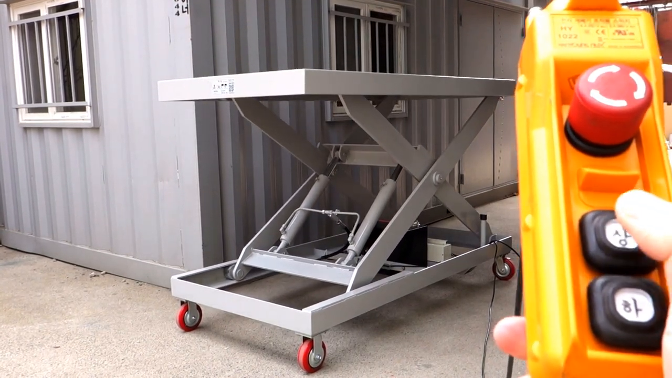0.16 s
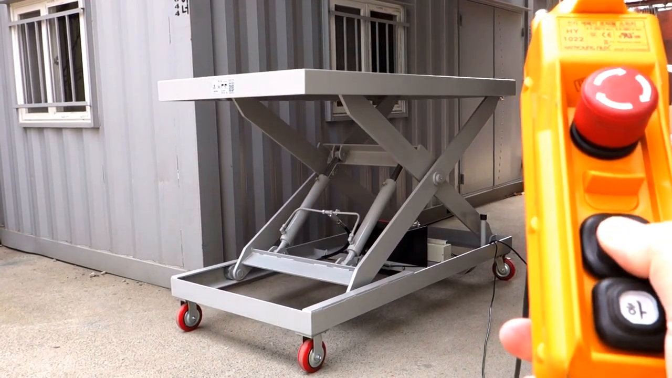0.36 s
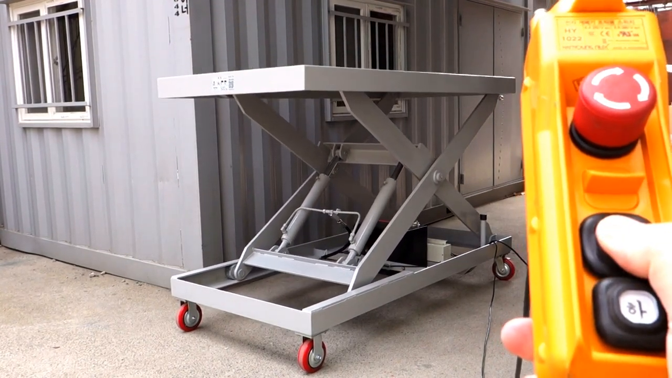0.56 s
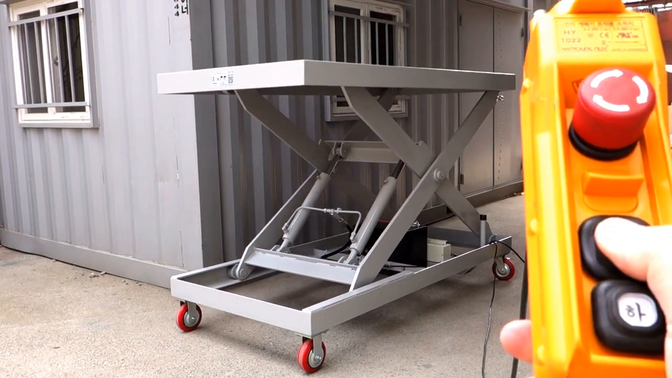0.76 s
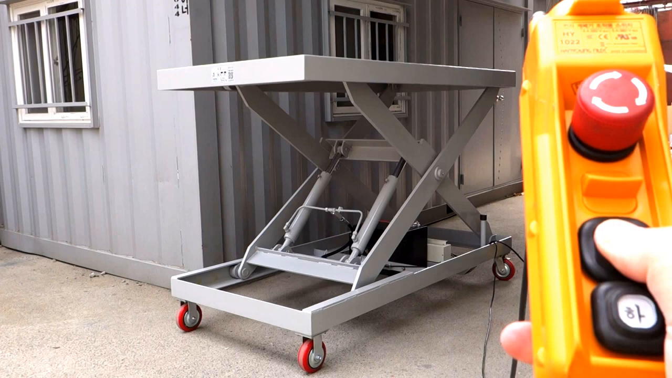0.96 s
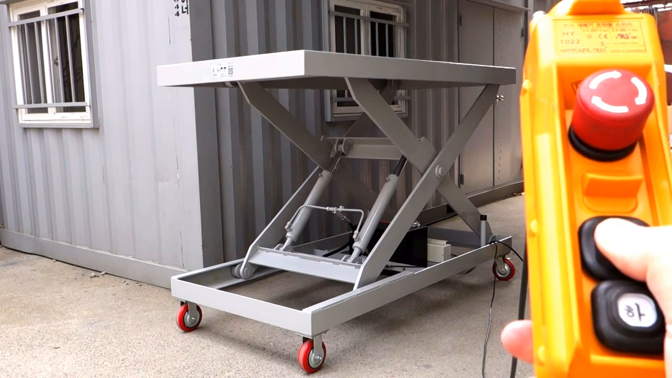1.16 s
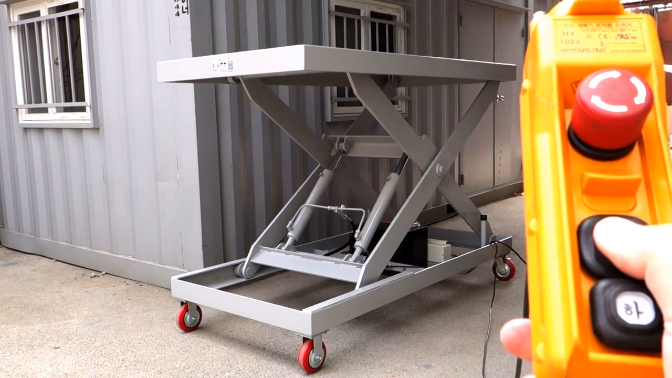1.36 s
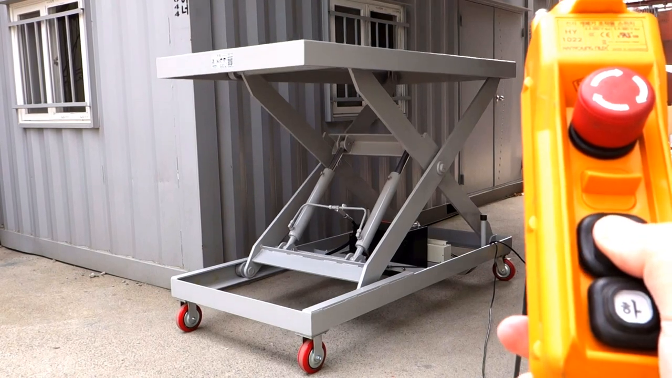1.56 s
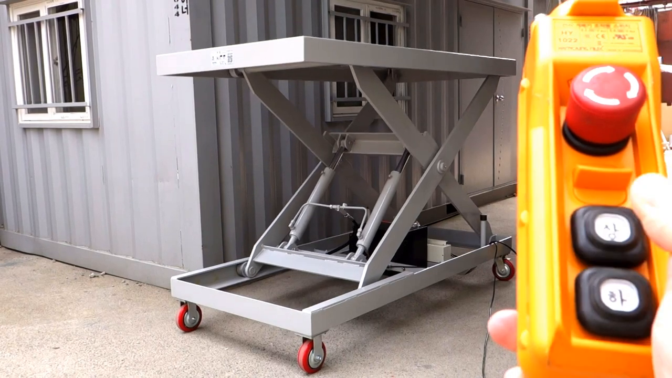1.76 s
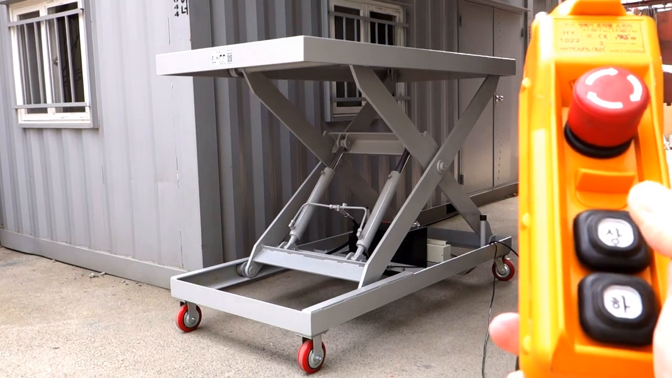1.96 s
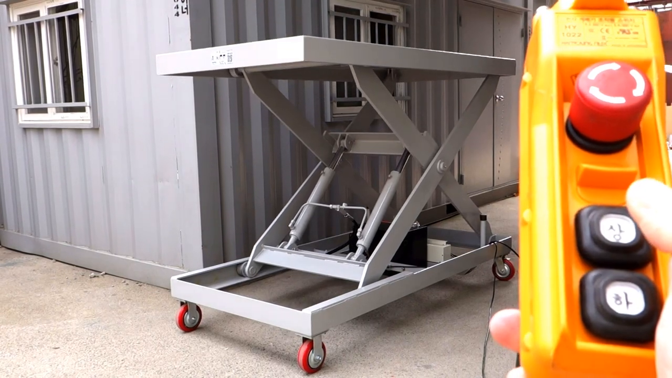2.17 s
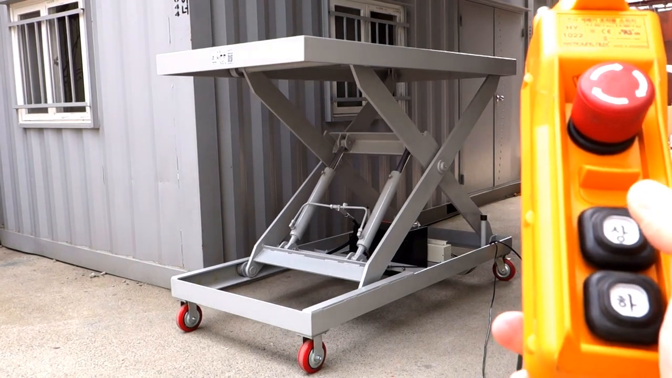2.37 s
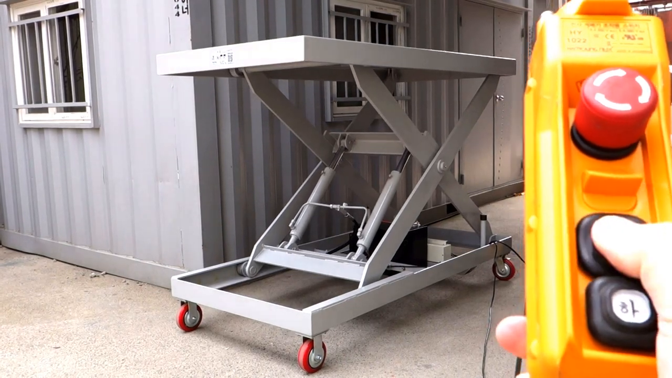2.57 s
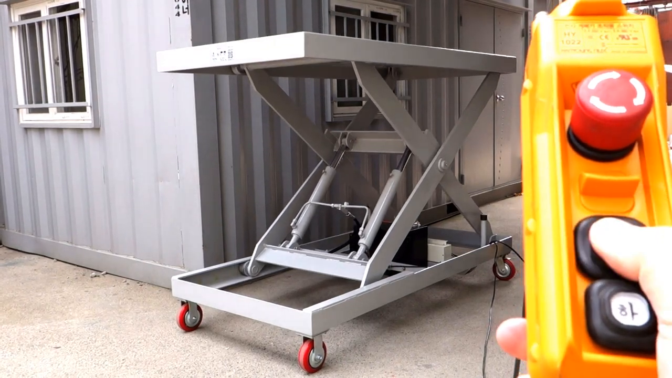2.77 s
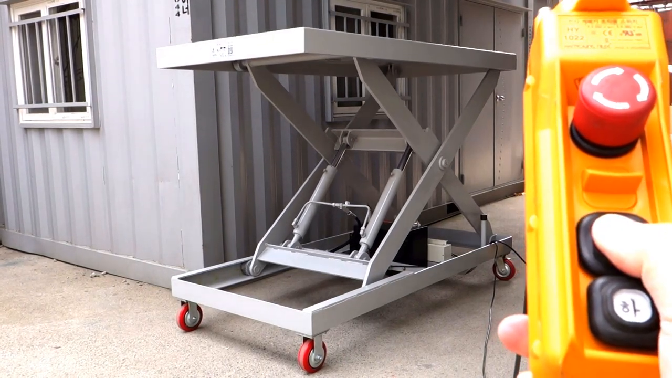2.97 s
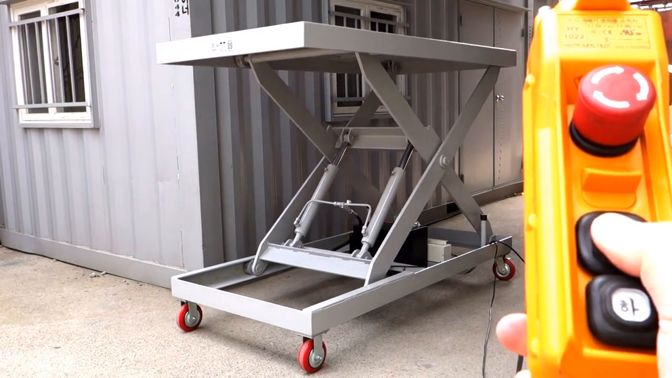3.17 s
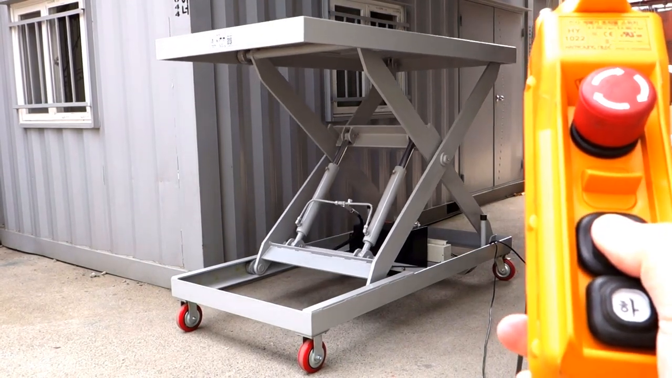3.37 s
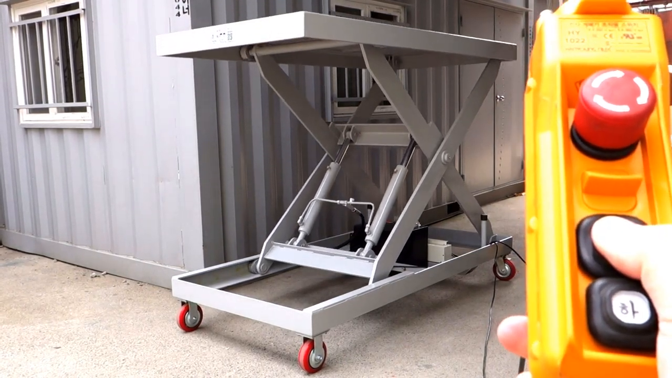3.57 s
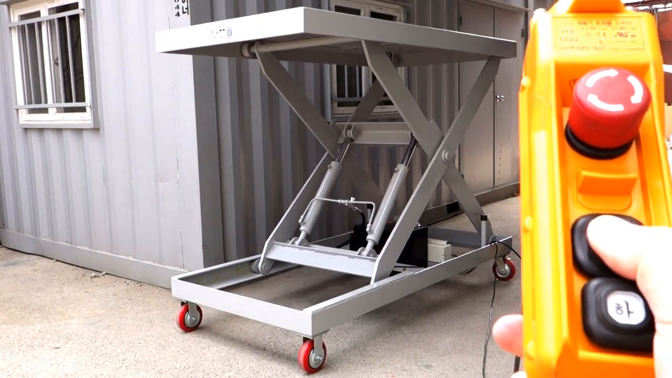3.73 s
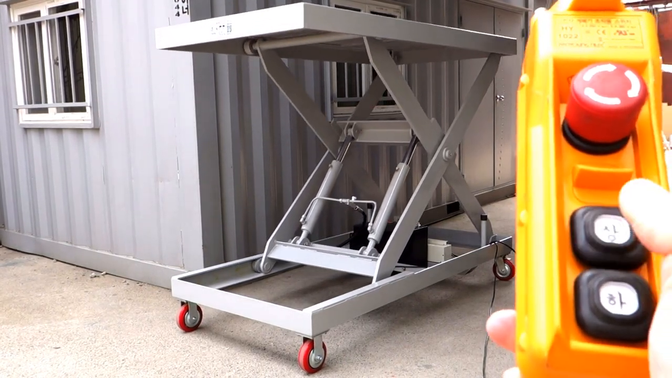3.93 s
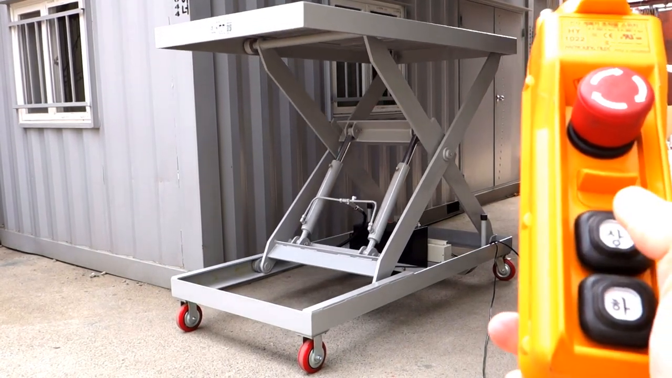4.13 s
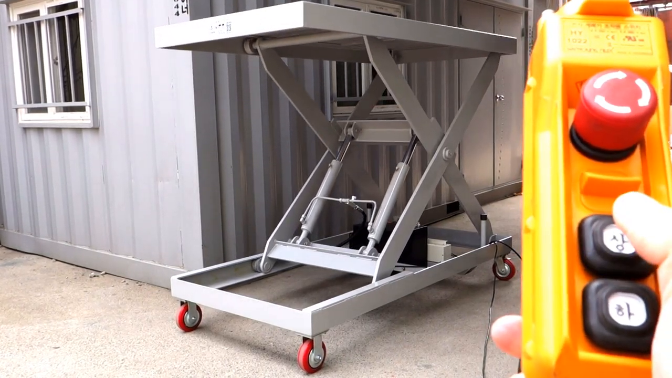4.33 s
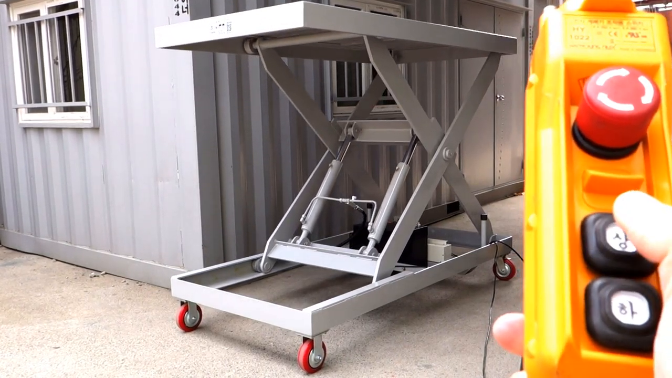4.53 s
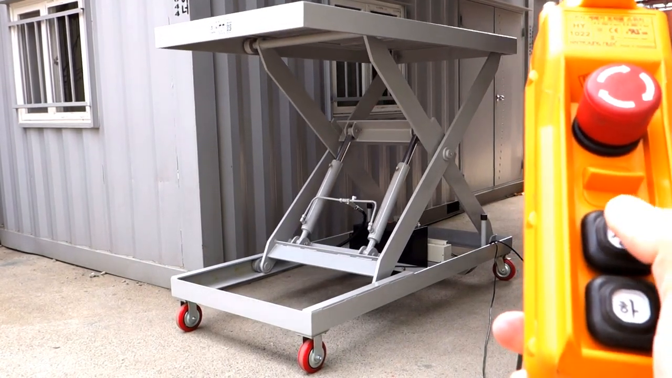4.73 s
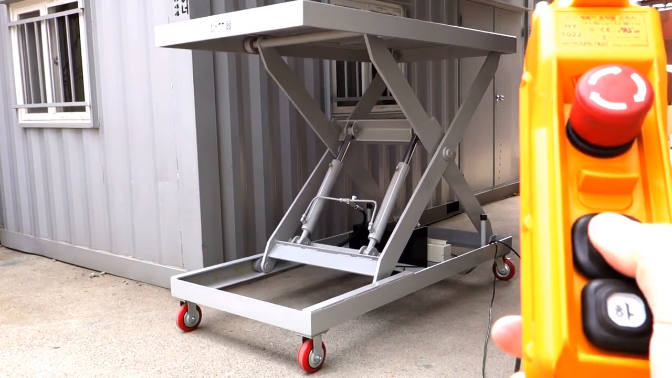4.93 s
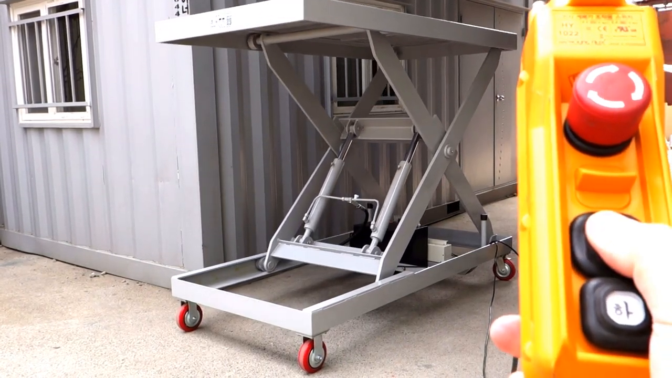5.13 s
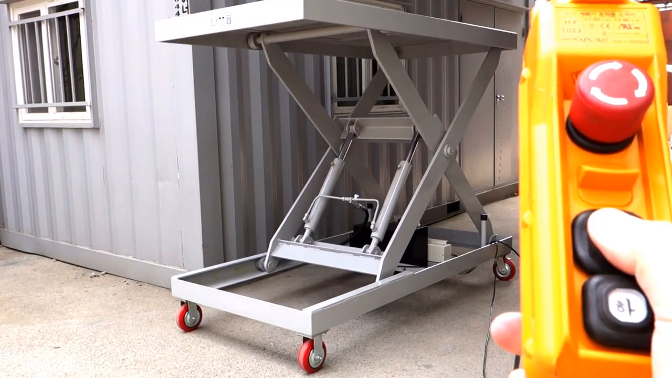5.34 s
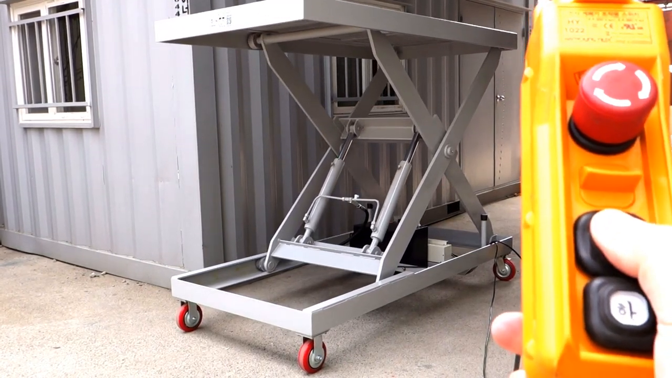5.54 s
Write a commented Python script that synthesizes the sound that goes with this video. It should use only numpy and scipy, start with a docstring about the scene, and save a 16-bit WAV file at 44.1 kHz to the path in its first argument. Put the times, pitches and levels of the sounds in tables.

```python
"""In a yard between steel walls, a lift table rises in three short runs; its hand pendant is close to the listener.
Short noise bursts make the button ticks; noise, ringing modes and echoes make the contactor clacks.
Steady tones and a repeating shaft pattern make the motor and nine-tooth gear pump; the frame rumbles and knocks.
Behind it lie shaped noise for far traffic and machines, and two soft tones for a faint hum that swells once."""
import sys
import numpy as np
from scipy import signal
from scipy.fft import rfft, irfft
from scipy.io import wavfile
from scipy.ndimage import uniform_filter1d

SR = 44100
rng = np.random.default_rng(int(sys.argv[2]) if len(sys.argv) > 2 else 0)


def dump_mix(stems):
    """Bounce the given channels to the path in sys.argv[1] as a 16-bit WAV at rate SR."""
    frames = np.atleast_2d(stems).T  # one column per channel
    limited = np.clip(frames, -1, 1)  # hard clip at full scale
    pcm = np.round(limited * 32767).astype(np.int16)
    wavfile.write(sys.argv[1], SR, pcm)


N = 246959
T = np.arange(N) / SR  # time in seconds

TOOTH_HZ, TEETH = 267.5, 9  # gear teeth meeting per second at full speed, teeth on the gear
EDGE_HZ = 15700  # upper limit of the sound
# How alike left and right are. Each row: pitch in Hz, likeness (1 is identical, 0 is unrelated).
LIKENESS = [(60, .9998), (150, .998), (380, .982), (950, .86), (2380, .56), (5980, 0), (15000, .15)]
# Colour of the contactor dropping out. Each row: pitch in Hz, relative level in dB per Hz.
DROP_OUT_COLOUR = [(290, -27), (500, -7), (718, -11), (1180, -7), (1280, 0.5), (1510, -14), (2040, -6.5),
                   (2390, -16), (3540, -18), (4940, -26.5), (10800, -30), (14500, -38.5), (16000, -56)]


def amp(db):
    """Turn decibels into a plain factor."""
    return 10 ** (np.asarray(db) / 20)


def evened(x):
    """Scale a sound to an average (rms) level of 1."""
    return x / np.sqrt(np.mean(x ** 2) + 1e-20)


def read(points, hz):
    """Read a table of (Hz, value) at any pitch, in straight lines over log pitch."""
    f, value = np.transpose(points)
    return np.interp(np.log(hz + 1), np.log(f + 1), value)


def add(mix, s, sound):
    """Add a stereo sound to the mix, starting at s seconds."""
    part = mix[:, round(s * SR):][:, :sound.shape[1]]
    part += sound[:, :part.shape[1]]


def phase_apart(hz):
    """Phase angle in radians that makes two equal tones as alike as left and right should be."""
    return np.arccos(np.clip(read(LIKENESS, hz), -1, 1))


def noise(field_db, length, size):
    """Stereo noise whose level in dB follows a function of Hz (column) and seconds (row)."""
    frames = 4 * length // size + 5
    hz = np.fft.rfftfreq(size, 1 / SR)[:, None]
    a, b, c, d = rng.standard_normal((frames, len(hz), 4)).T
    same = np.clip(read(LIKENESS, hz), -1, 1)
    left = a + 1j * b
    right = same * left + np.sqrt(1 - same ** 2) * (c + 1j * d)
    spectrum = np.array([left, right]) * amp(field_db(hz, np.arange(frames) * size / 4 / SR))
    return signal.istft(spectrum, nperseg=size, noverlap=3 * size // 4)[1][:, :length]


def tone(hz, turns):
    """A stereo sine of rms 1; its two sides differ in phase as far as they are unlike at that pitch."""
    start, sign = rng.random(), rng.choice([-1, 1])
    side_phase = np.array([[0], [sign * phase_apart(hz)]])
    return np.sqrt(2) * np.sin(2 * np.pi * (turns + start) + side_phase)


def wander(rate):
    """A slow random curve: straight lines between random points, rate points per second."""
    knots = rng.standard_normal(int(N / SR * rate) + 2)
    return np.interp(T[::64] * rate, np.arange(len(knots)), knots).repeat(64)[:N]


def yard():
    """Traffic and machines far off: shaped noise with patches that drift in pitch and time."""
    # Colour of the distant sound. Each row: pitch in Hz, relative level in dB per Hz.
    yard_colour = [(25, -12), (40, -3.5), (52, 3), (75, -6), (110, -10.5), (240, -5), (420, -12.5),
                   (690, -14), (1000, -19), (1700, -22.5), (3000, -31), (5000, -43.5), (9000, -56),
                   (15000, -66)]
    # How the distance comes and goes. Each row: time in seconds, level in dB, extra deep bass in dB.
    distance = [(0, -38, 0), (.35, -36.5, 0.5), (1.0, -34, 0.5), (1.9, -32, -3.5), (2.6, -33.5, 1),
                (3.6, -34, 2), (4.1, -33, 1), (4.4, -34.5, 5), (4.8, -35, 1), (5.3, -33.5, 0.5),
                (5.6, -34, 3)]
    s, level_db, bass_db = np.transpose(distance)
    patches = rng.standard_normal((N // 256 + 9, 513)).T
    patches = uniform_filter1d(patches, 5, 0)  # smooth over pitch
    patches_db = evened(uniform_filter1d(patches, 14, 1))  # smooth over time

    def field(hz, t):
        bass = np.interp(t, s, bass_db) * np.clip(2 - hz / 70, 0, 1)
        return read(yard_colour, hz) + bass + patches_db[:, :len(t)]
    return amp(np.interp(T, s, level_db)) * evened(noise(field, N, size=1024))


def drone():
    """A faint hum far off: a tone and its octave swell once, waver in pitch and fade."""
    start_s, rise_s, hold_s, fading_db_per_s = 1.865, 0.031, .15, 28
    drone_hz = 223.4
    turns = np.cumsum(drone_hz * (1 + 0.0157 * wander(12.0))) / SR
    rise = np.clip((T - start_s) / rise_s, 0, 1)
    fade = amp(-fading_db_per_s * np.maximum(T - start_s - hold_s, 0))
    first = amp(-42) * tone(drone_hz, turns)
    octave = amp(-40) * tone(2 * drone_hz, 2 * turns)
    return rise * fade * (first + octave)


def shudder(length):
    """The scissor frame takes up the load: broad rumble in its resonances."""
    # Resonances of the frame. Each row: pitch in Hz, width in Hz, relative level in dB.
    frame_modes = [(120, 39, -3.5), (179, 110, -4.5), (318, 120, 5), (577, 26, -14), (668, 36, 2),
                   (1000, 135, -4), (1274, 103, -6.5)]

    def field(hz, t):
        power = sum(amp(2 * db) / (1 + (2 * (hz - f) / width) ** 2) for f, width, db in frame_modes)
        return 10 * np.log10(power) + 0 * t
    return evened(noise(field, length, size=1024))


def knock(level_db, hz):
    """A soft blow rings one member of the frame, and the joints rattle briefly around its pitch."""
    # How long the frame rings. Each row: pitch in Hz, time to fade by 60 dB in seconds.
    members = [(290, .22), (560, 0.24), (650, 0.38), (1000, 0.098)]
    t = np.arange(SR // 3) / SR
    rattle_db, rattle_s = -9.5, .03

    def field(f, u):
        return -9.0 * abs(np.log2((f + 50) / (1.33 * hz))) + 0 * u
    rattle = evened(noise(field, len(t), size=256)) * np.exp(-t / rattle_s)
    ring = amp(-60 * t / read(members, hz)) * tone(hz, hz * t)
    soft_start = np.minimum(t / 0.0057, 1)
    return amp(level_db) * (ring + amp(rattle_db) * rattle) * soft_start


def gears(turns, settled):
    """One shaft turn repeats and slowly changes: shaft multiples cluster round tooth multiples, over oil hiss."""
    # Colour of the gear whine. Each row: pitch in Hz, relative level in dB per Hz.
    whine_colour = [(710, -17), (1200, -26), (1380, -3), (1510, -2), (1560, -7.5), (1700, -10), (2270, -2),
                    (2620, -6.5), (2790, -3), (3870, -11), (4220, -15), (5350, -15), (10300, -13.5),
                    (14000, -18.5), (16000, -27)]
    # Resonances of the pump housing. Each row: pitch in Hz, width in Hz, level above the whine in dB.
    housing = [(2540, 94, 2), (2644, 79, 13.5), (5000, 66, 0), (6140, 370, 3.5), (6970, 37, 10.5),
               (8000, 68, -4), (8300, 280, 5.5), (9000, 180, 5.5), (9410, 87, 6), (10080, 360, 7.5),
               (10730, 150, 7.5), (12800, 160, 2), (13900, 250, 5), (14700, 300, 2)]
    order = np.arange(2049)  # multiples of the shaft speed
    hz = order * TOOTH_HZ / TEETH
    away = abs((order + TEETH // 2) % TEETH - TEETH // 2)  # orders to the nearest tooth multiple
    high_orders = order > 16 * TEETH - TEETH // 2  # clusters only from the 16th tooth multiple up
    cluster_db = (4.9 * np.exp(-(away / 0.97) ** 2) + 5.8 * (away == 0)) * high_orders
    apart = rng.choice([-1, 1], 2049) * phase_apart(hz)
    sides = np.exp(1j * np.outer([0, 1], apart))
    orders = amp(cluster_db) * (hz > 1200) * (hz < EDGE_HZ) * sides

    at = turns / TEETH % 1 * 16384  # place within one shaft turn
    t = np.arange(len(turns)) / SR
    comb = 0
    for k in range(8):  # patterns fade into each other as the load angle changes
        a, b = rng.standard_normal((2, 2049))
        cycle = irfft(orders * (a + 1j * b), 16384)
        share = np.cos(np.pi / 2 * np.clip(t / .25 - k, -1, 1))
        played = np.array([np.interp(at, np.arange(16384), c, period=16384) for c in cycle])
        comb = comb + share * played

    # flat up to the edge, 40 dB lower above it
    hiss = evened(noise(lambda f, u: (f < EDGE_HZ) * 40. + 0 * u, len(turns), size=512))
    mix = settled * evened(comb) + np.sqrt(1 - settled ** 2 + amp(-13.0)) * hiss
    f = np.fft.rfftfreq(2 ** 17, 1 / SR)
    housing_db = sum(db / (1 + (2 * (f - mode_hz) / width) ** 2) for mode_hz, width, db in housing)
    mix = irfft(rfft(mix, 2 ** 17) * amp(read(whine_colour, f) + housing_db))[:, :len(turns)]
    high = signal.sosfilt(signal.butter(4, 5000, "high", fs=SR, output="sos"), mix)
    return mix / high.std()  # the part above 5 kHz gets level 1


def run(on_s, off_s, whine_db, shudder_db, fading_db):
    """Motor and pump spin up at pull-in and hum, whine and shake; after drop-out the sound dies between the walls."""
    # Steady tones of the oil pulses. Each row: multiple of the tooth rate, relative level in dB.
    ripple_tones = [(2, -13), (3, -25), (5, -27.5), (6, -24), (7, -28.5), (8, -29.5), (9, -28.5), (11, -29),
                    (12, -29.5), (13, -34.5), (15, -39)]
    # Tones that swell and sink as the table rises.
    # Each row: time in seconds, then levels in dB of tooth multiples 1, 4, 10 and 14.
    pump_tones = [(.7, -26, -38.5, -56, -64), (.85, -27, -41.5, -56, -60), (1.0, -28.5, -39, -66, -60),
                  (1.2, -28.5, -37.5, -55, -66), (1.4, -29.5, -37, -52, -63), (1.62, -29.5, -37, -46, -56),
                  (2.9, -29.5, -41.5, -58, -69), (3.05, -28, -43, -57, -57), (3.2, -25.5, -45, -54, -51),
                  (3.35, -27, -48, -55, -53), (3.51, -26, -54, -57, -60), (3.63, -26, -42, -58, -58),
                  (3.82, -25, -41.5, -45, -55), (5.05, -26.5, -45, -60, -64)]
    hum_hz, hum_db = 240, -33
    upper_db, waver_db = -26.5, 1  # level of the steady tones, their wavering per octave
    slip, spin_up_s = .2, .16  # share of speed missing at pull-in, time to catch up
    pressure_s, build_s, unloaded_db = 0.14, 0.11, -11  # tones are weak until oil pressure builds
    shudder_hold_s, shudder_floor_db = 0.16, -44.5

    t = np.arange(on_s, min(off_s + .7, N / SR), 1 / SR)
    since = t - on_s
    turns = np.cumsum(TOOTH_HZ * (1 - slip * np.exp(-(since / spin_up_s) ** 2))) / SR
    loaded = amp(unloaded_db * (1 - np.clip((since - pressure_s) / build_s, 0, 1)))
    settled = np.clip((since - .15) / 0.17, 0, 1)  # the gears mesh evenly once the oil is under pressure

    steady = 0
    for k, db in ripple_tones:
        k = round(k)
        wavering_db = waver_db * np.log2(k) * wander(3.05)[:len(t)]
        steady = steady + amp(wavering_db + db + upper_db) * tone(k * TOOTH_HZ, k * turns)
    s, first_db, *swelling_db = np.transpose(pump_tones)
    swelling = 0
    for k, db in zip((4, 10, 14), swelling_db):
        swelling = swelling + amp(np.interp(t, s, db)) * tone(k * TOOTH_HZ, k * turns)
    ripple = settled * steady + loaded * swelling

    first = loaded * amp(np.interp(t, s, first_db)) * tone(TOOTH_HZ, turns)
    low = first + amp(hum_db) * tone(hum_hz, hum_hz * t)
    shake_fade_db = fading_db * np.maximum(since - shudder_hold_s, 0)
    shaking = amp(shudder_db - shake_fade_db) + amp(shudder_floor_db)
    high = ripple + amp(whine_db) * gears(turns, settled) + shaking * shudder(len(t))
    rise = np.minimum(since / 0.028, 1)
    after = np.maximum(t - off_s - .04, 0)
    return rise * (low * amp(-100.0 * after) + high * amp(-140.0 * after))  # fading in dB per second


def latch():
    """The armature scrapes free just before it drops: a very short noise."""
    t = np.arange(400) / SR
    scrape = evened(noise(lambda f, u: read(DROP_OUT_COLOUR, f) + 0 * u, 400, size=128))
    return amp(-28.0) * scrape * np.minimum(t / 0.0014, 1)


def clack(sharp_db, thump_db, thump_hz, colour, axis, ring_db, rise_s, bounce_s, hold_s, echo_db):
    """The armature lands and bounces, the box rings, and near walls hold the echo up before it dies."""
    # Ringing of the switch box. Each row: pitch in Hz, relative level in dB at pull-in,
    # relative level in dB at drop-out, time to fade by 60 dB in seconds.
    box_modes = [(430, -6, -15, 0.25), (651, -5.5, 0, 0.3), (719, -7, 8.5, 0.13), (994, -28, -21, 0.058),
                 (1321, -2, 12, 0.13), (1455, -14, -50, 0.27), (1823, 7, -24, 0.028),
                 (2060, -17, -25, 0.25), (2590, -10.5, -9, 0.22), (3600, -14, 6, 0.038)]
    # How the echo dies after its hold. Each row: pitch in Hz, time to fade by 60 dB in seconds.
    wall_fading = [(250, 0.53), (1000, 0.68), (2500, 0.68), (6000, 0.58), (12000, 0.37)]
    t = np.arange(SR) / SR
    bounce = np.exp(-t / bounce_s)
    blows = (rng.random(SR) < 450 / SR) * rng.choice([-1, 1], SR) * bounce  # about 450 chances a second
    blows[0] = 1
    modes = sum(amp(mode[axis] - 60 * t / mode[3]) * np.sin(2 * np.pi * mode[0] * t) for mode in box_modes)
    ring = signal.fftconvolve(blows, modes)[:SR]
    crack = evened(noise(lambda f, u: read(colour, f) + 0 * u, SR, size=256)) * bounce

    def echo_field(f, u):
        return read(colour, f) - 60 * np.maximum(u - hold_s, 0.42 * u) / read(wall_fading, f)
    echo = noise(echo_field, SR, size=256)
    slap = 1 + 0.3 * np.exp(-((t - .1) / 0.0084) ** 2)  # the far wall answers once
    echo *= slap * np.minimum(t / 0.01, 1) / echo[:, :2000].std()
    thump = np.sin(2 * np.pi * thump_hz * t) * amp(-60 * t / 0.12) * np.minimum(t / 0.0041, 1)
    sharp = amp(-2.5) * crack + amp(ring_db) * ring / abs(ring).max() + amp(echo_db) * echo
    return amp(sharp_db) * sharp * np.minimum(t / rise_s, 1) + amp(thump_db) * thump


def tick(level_db, pan_db, tilt_db):
    """A dry plastic snap: a short burst through the pendant shell, and a faint rattle after it."""
    # Colour of the pendant shell. Each row: pitch in Hz, relative level in dB per Hz.
    shell_colour = [(800, -12), (1300, -8.5), (2000, -4.5), (2450, 1.5), (3100, 2), (3900, 3), (5200, -3),
                    (8000, -8.5), (11000, -13), (16000, -31)]
    u = np.arange(1500) / SR / 0.0014  # time in units of 1.4 ms

    def field(f, t):
        return read(shell_colour, f) + tilt_db * np.log2(f / 3000 + 0.012) + 0 * t
    burst = evened(noise(field, 1500, size=128))
    snap = (u * np.exp(1 - u)) ** 2
    rattle = 0.32 * np.exp(-u / 7.2) * np.minimum(u, 1)
    sides = amp([[pan_db / 2], [-pan_db / 2]])
    return amp(level_db) * sides * burst * (snap + rattle)


def place_right(unit):
    """The power unit stands to the right: the left side is softer and mostly a little behind in phase."""
    # Loudness difference. Each row: pitch in Hz, left minus right in dB.
    side_level = [(150, 0), (250, -.7), (550, -1.3), (1200, -2.8), (2500, -3), (5000, -2.4), (9000, -3.2),
                  (14000, -6)]
    # Phase difference. Each row: pitch in Hz, radians by which left leads.
    side_phase = [(300, 0), (1000, -.2), (2700, -.7), (4500, -.7), (7000, 0)]
    hz = np.fft.rfftfreq(2 ** 18, 1 / SR)
    lean = amp(read(side_level, hz) / 2) * np.exp(.5j * read(side_phase, hz))
    return irfft(rfft(unit, 2 ** 18) * np.array([lean, 1 / lean]))[:, :N]


def scene():
    """Three runs with their clacks and knocks, the pendant ticks, and the distance behind them."""
    # One row a run: gear whine in dB, frame shudder at pull-in in dB, its fading in dB per second.
    runs = [(-46, -29, 33), (-46.5, -33, 38), (-44, -29, 4)]
    # The contactor pulls in. Each row: time in seconds, level of the sharp part in dB,
    # level of the low thump in dB, thump pitch in Hz.
    pulls = [(0.4098, -18, -16, 325), (2.627, -17, -15.5, 371), (4.8733, -17, -10.5, 382)]
    # The contactor drops out. Each row: time in seconds, level of the sharp part in dB,
    # level of the low thump in dB, thump pitch in Hz.
    drops = [(1.6567, -11.5, -16.5, 379), (3.8568, -11.5, -16.5, 383.8), (5.0913, -12, -15.5, 397)]
    # Colour of the contactor pulling in. Each row: pitch in Hz, relative level in dB per Hz.
    pull_in_colour = [(290, -9), (500, 2), (678, -7), (946, -3.5), (1510, -2), (1820, 6), (2040, -4.5),
                      (2190, -6), (2850, -8.5), (3340, -4), (6610, -17.5), (9360, -18), (16000, -41)]
    # The cylinders take the load with knocks in the frame.
    # Each row: time in seconds, level in dB, ring pitch in Hz.
    knocks = [(.424, -25.5, 648.5), (.52, -25.5, 977), (0.577, -19.5, 285.5), (0.597, -27.5, 570),
              (0.654, -22, 291), (.69, -25, 563), (.725, -27.5, 1006), (.748, -31, 660),
              (0.868, -31.5, 1223), (.6, -30, 1250), (2.75, -30, 1270), (2.73, -27.5, 993),
              (2.779, -19.5, 299.4), (2.819, -20, 294.4), (4.9, -30, 643), (5.004, -17, 287)]
    # The pendant button. Each row: time in seconds, level in dB, left minus right in dB,
    # treble tilt in dB per octave.
    ticks = [(0.387, -32, -7, 2), (0.397, -25.5, -4, 1.5), (1.627, -30.5, -10, 0),
             (2.5774, -25.5, -2.5, -5.5), (2.6025, -29, -11, 2), (2.612, -21.5, -1.5, -4.5),
             (3.8154, -36, -2, -1), (3.828, -26.5, -6, 1), (4.838, -28, -1, -7), (4.8466, -25.5, -5.0, -1),
             (4.849, -30, -12, 4), (4.855, -18.5, -5, -0.7)]
    unit, pendant = np.zeros((2, 2, N))
    for row, pull, drop in zip(runs, pulls, drops):
        add(unit, pull[0], run(pull[0], drop[0], *row))
        add(unit, pull[0], clack(*pull[1:], pull_in_colour, axis=1, ring_db=1.5, rise_s=0.0051,
                                 bounce_s=0.021, hold_s=0.074, echo_db=-18.0))
        add(unit, drop[0], clack(*drop[1:], DROP_OUT_COLOUR, axis=2, ring_db=-1.5, rise_s=0.00085,
                                 bounce_s=0.013, hold_s=0.019, echo_db=-9.5))
        add(unit, drop[0] - 400 / SR, latch())
    for s, *row in knocks:
        add(unit, s, knock(*row))
    for s, *row in ticks:
        add(pendant, s, tick(*row))
    return yard() + drone() + place_right(unit) + pendant


def record(dry):
    """The microphone drops the deepest bass; then everything above the upper limit is cut."""
    thinned = signal.sosfilt(signal.butter(3, 42, "high", fs=SR, output="sos"), dry)
    lowpass = signal.firwin(511, EDGE_HZ, window=("kaiser", 9), fs=SR)
    return signal.oaconvolve(thinned, lowpass[None], "same")


dry = scene()
out = record(dry)
dump_mix(out)
```